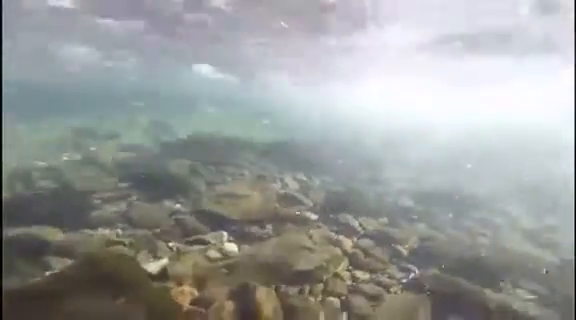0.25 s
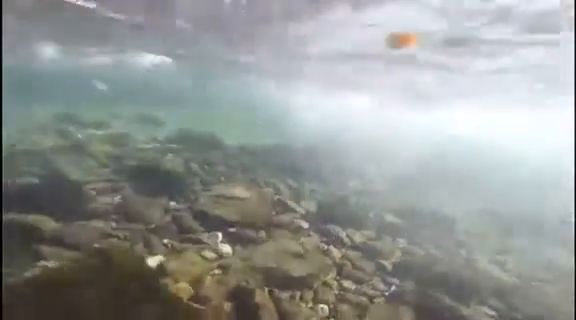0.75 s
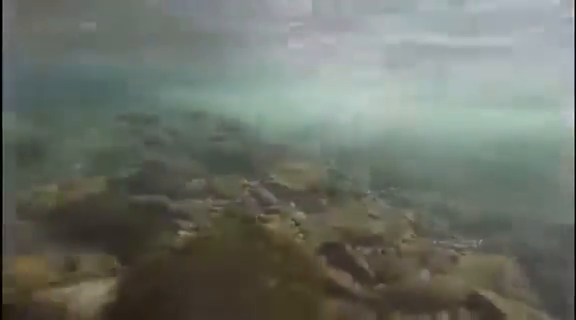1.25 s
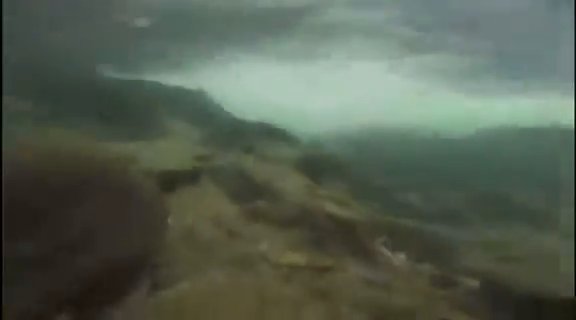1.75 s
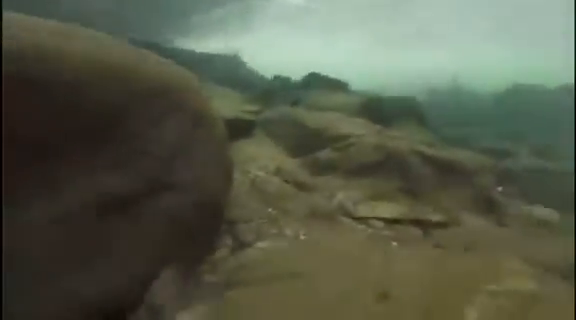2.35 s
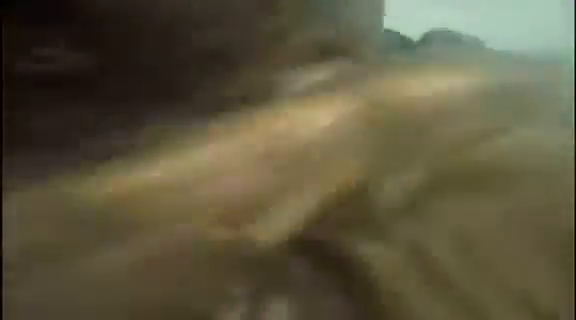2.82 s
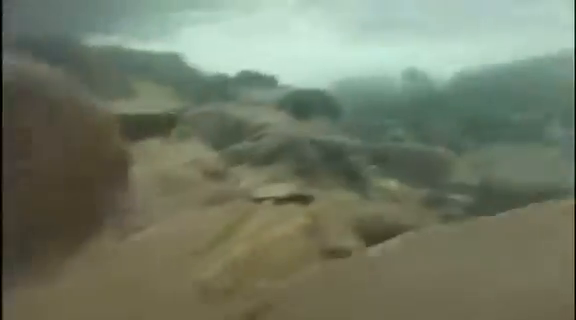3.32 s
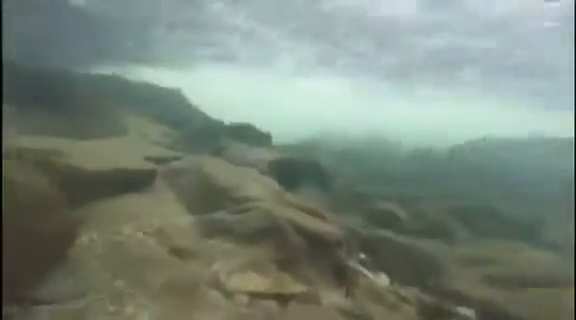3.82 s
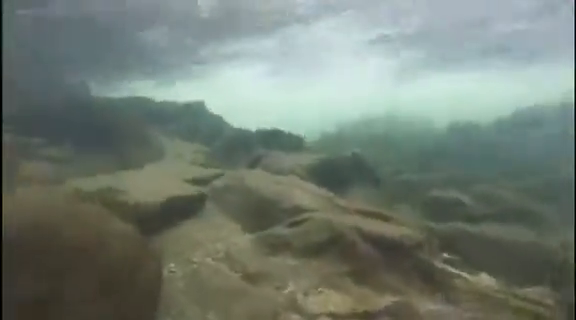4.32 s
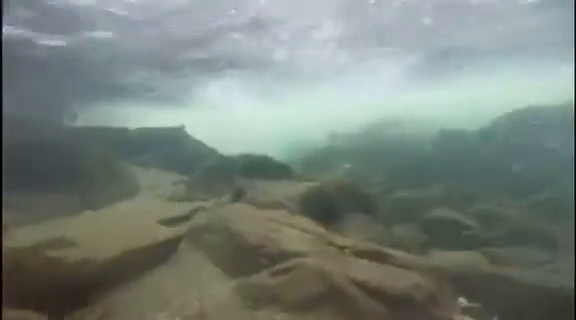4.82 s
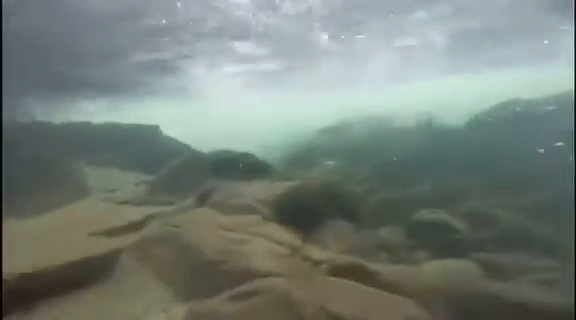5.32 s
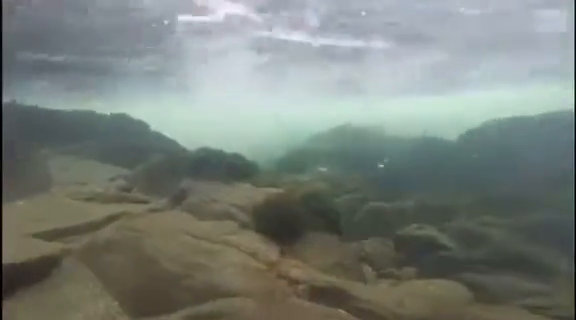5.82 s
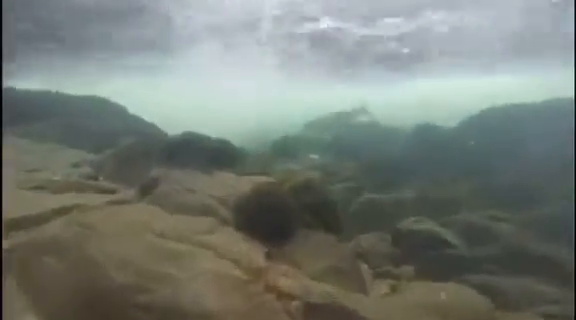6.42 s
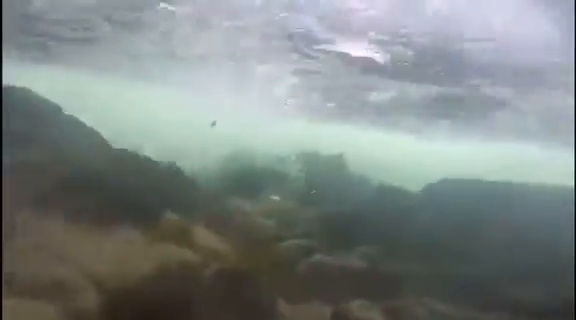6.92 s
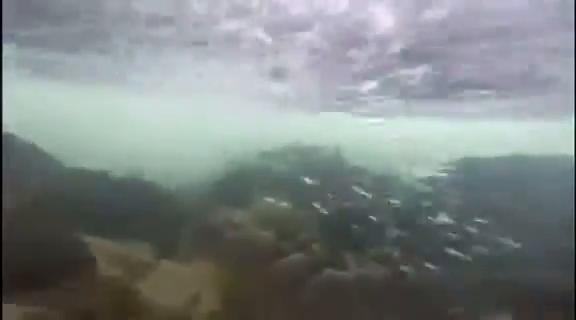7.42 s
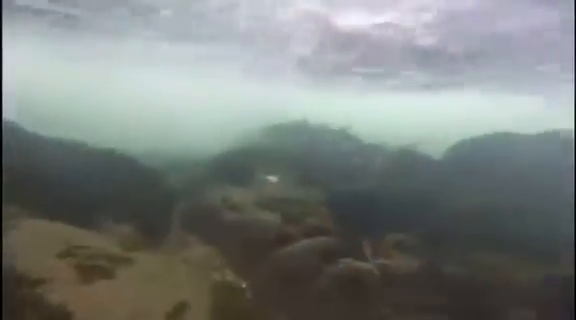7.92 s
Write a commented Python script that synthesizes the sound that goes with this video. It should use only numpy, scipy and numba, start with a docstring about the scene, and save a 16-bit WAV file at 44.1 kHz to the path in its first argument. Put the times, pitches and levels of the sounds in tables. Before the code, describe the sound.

Everything is close, mono and muffled, heard from inside a sealed hard housing under shallow river water. Deep uneven rumble, grip rub and hollow gurgle start at once; at 0.14 s a very loud, short pebble knock strikes. A softer click comes at 0.7 s, then from 0.88 to 1.4 s gritty scraping and crowded ticks. From 1.55 to 1.75 s a quick dull plastic rattle runs, with another click at 1.94 s. Low buffets continue until a heavy thump at 2.75 s, followed by rubbing and dense scraping; 3.05-3.33 s is the harshest, with hard bright clicks, crunch and slight overload. It drops suddenly. A lone click sounds at 3.69 s, then muted bumps at 4.3-4.7 s. From 5 s quiet flow carries bubble blips, clustered near 6 s; low rumbling jolts come around 6.75 s, then small blips and sparse ticks until 8.1 s, over faint hiss and whine.

```python
"""River flow buffets a sealed camera housing carried under shallow water over a stony bed.
Filtered noise gives the rocking and the rub of the grip; swarms of short rings give gurgle and grit.
Pebbles click, grains tick and dull dents rattle the wall: decaying modes, with noise cracks for the pebbles.
Soft blips, mostly bubbles, ring with rising pitch, bumps thud in body and shell,
and sines give the faint whine of the electronics over a thin hiss of noise bands."""
import sys
import numpy as np
from scipy import signal
from scipy.io import wavfile
from scipy.ndimage import uniform_filter1d
from numba import njit

SR = 44100
rng = np.random.default_rng(int(sys.argv[2]) if len(sys.argv) > 2 else 0)


def wav_out(sig):
    """Save sig, one row per channel (or a flat mono array), as 16-bit PCM at SR to the path in sys.argv[1]."""
    wavfile.write(sys.argv[1], SR, np.round(np.clip(np.atleast_2d(sig).T, -1, 1) * 32767).astype(np.int16))


N = 359856

# Steady current round the housing: time_s [s], buffet_db [dB], grip_db [dB], gurgle_db [dB]
CURRENT = [(0, -35.5, -43, -40.5), (.45, -40, -48, -43), (.8, -43.5, -49.5, -42), (1.3, -47.5, -49, -51.5),
           (1.85, -40, -62, -50.5), (2.3, -38.5, -52, -51), (2.7, -39.5, -56, -54), (2.9, -26, -36, -42.5),
           (3.2, -33.5, -43, -39.5), (3.33, -37, -61, -64.5), (3.85, -37.5, -55.5, -51.5),
           (4.25, -45, -54, -51.5), (4.899, -46, -57, -59), (5.5, -51.5, -55.5, -50.5),
           (6.55, -47.5, -57, -53), (6.9, -35, -54.5, -55.5), (7.4, -37.5, -54.5, -49.5),
           (8.16, -39.5, -53, -47.5)]
# Jolts of the carrying hand: crest_s [s], buffet_db [dB], grip_db [dB], gurgle_db [dB]
HAND_JOLTS = [(0.155, -27, -40, -30.5), (0.589, -27, -36, -36.5), (0.904, -25.5, -30.5, -32.5),
              (.95, -34, -38.5, -34), (1.104, -25, -44, -38.5), (1.201, -28.5, -47, -40),
              (1.426, -36, -44, -45), (1.6, -31, -41, -50), (1.665, -42, -54, -44.5),
              (1.75, -36.5, -46.5, -44), (2.018, -35, -37, -44), (2.089, -27.5, -53, -41),
              (2.34, -34, -44.5, -45), (2.49, -25.5, -56, -61), (2.618, -29, -70, -46),
              (2.761, -19, -28.5, -40.5), (2.831, -42, -23, -55), (2.978, -21.5, -50, -46),
              (3.108, -20, -34.5, -34), (3.652, -34.5, -48, -62), (4.341, -27, -63, -46.5),
              (4.409, -32.5, -48.5, -59), (4.5, -20, -39, -50), (4.716, -25, -53, -49),
              (6.341, -47, -73, -43), (6.742, -23.5, -56, -60), (6.835, -28.5, -68, -49),
              (6.94, -45, -64, -48)]
# Slopes before and after a jolt's crest: buffet, grip, gurgle [dB/s]
JOLT_RISE = (456, 506, 402)
JOLT_FALL = (198, 301, 298)
# Grit drifting past: time_s [s], grains_db [dB], silt_db [dB], treble_db [dB]
DRIFTING_GRIT = [(0, -62.5, -79, -76), (.85, -56.5, -68.5, -80), (1.5, -61, -52, -93),
                 (1.9, -55.5, -65, -69), (2.7, -60.5, -58.5, -68), (3.5, -59.5, -61.5, -71.5),
                 (4.0, -57, -70, -68), (4.7, -68, -58, -71), (5.1, -61.5, -75, -68.5),
                 (6.1, -62.5, -67, -69.5), (7.3, -58, -71, -68), (8.16, -83, -57.5, -68)]
# Scrapes on stones: start_s [s], length_s [s], grains_db [dB], silt_db [dB], treble_db [dB], sand_db [dB]
STONE_SCRAPES = [(0, 0.11, -58.5, -49.5, -62, -57), (0.135, 0.061, -51, -62, -86, -54),
                 (0.539, 0.041, -60, -68, -64.5, -50.5), (0.876, 0.036, -38, -55, -60, -51),
                 (0.928, 0.08, -45, -36.5, -58.5, -39.5), (1.018, 0.15, -45.5, -55, -56, -57.5),
                 (1.18, 0.17, -48.5, -53, -62, -55), (1.35, 0.06, -50, -66, -55.5, -44.5),
                 (1.411, 0.01, -38, -39, -60, -51), (1.576, 0.12, -55.5, -50, -82, -61),
                 (2.752, 0.3, -50.5, -57, -62.5, -60), (2.852, 0.05, -58.5, -38.5, -53.5, -63),
                 (2.903, 0.1, -59, -39.5, -56.5, -70), (3.009, 0.12, -43.5, -33.5, -54.5, -47),
                 (3.143, 0.061, -36, -36, -55.5, -45.5), (3.22, 0.04, -43, -42.5, -52, -38),
                 (3.25, 0.016, -43, -40, -66, -52), (3.587, 0.041, -59, -67, -71, -70),
                 (3.693, 0.004, -48, -53, -48, -57), (4.12, 0.058, -61, -57, -69, -63),
                 (4.33, 0.012, -65, -49.5, -62, -72), (4.473, 0.044, -66, -57, -71, -64),
                 (4.696, 0.039, -59, -58, -80, -59), (7.334, 0.023, -65, -50.5, -67, -57),
                 (7.985, 0.14, -59.5, -82, -61.5, -65.5)]
# Wall modes that the grains excite: pitch_hz [Hz]
WALL_MODES = (1275, 1620, 1818, 2517, 3056)
# Pebble clicks: start_s [s], level_db [dB], low_hz [Hz], low_db [dB], high_hz [Hz], high_db [dB],
# crack_db [dB], t60_s [s]; low_db, high_db and crack_db are relative to level_db, t60_s is limited in use
PEBBLE_CLICKS = [(0.0934, -29, 1870, -4, 2460, -23, -13, 0.06),
                 (0.14, 2.2, 1346, -3.5, 2950, -21.5, -17, 0.0095),
                 (0.1585, -4.5, 1600, -3.5, 3550, -8, -30, 0.02),
                 (0.5345, -39, 1830, -18, 2650, 0.5, -24, 0.043),
                 (0.71, -14.5, 1894, -1.5, 3380, -7, -20, 0.026),
                 (0.833, -29.5, 2050, -5.5, 2380, -11, -11, 0.039),
                 (0.8804, -11.5, 1140, -5, 2570, -18, -13, 0.016),
                 (0.952, -17, 1830, -12, 2440, -10, -20, 0.026),
                 (1.008, -19.5, 1530, -8, 2520, -16, 0.5, 0.02),
                 (1.061, -14, 1150, -4, 2900, -32, -21, 0.046),
                 (1.197, -29, 1990, -3, 2410, -2.5, -14, 0.024),
                 (1.2493, -33, 1610, 2.5, 2620, -18, -8, 0.027),
                 (1.2812, -27.5, 1700, -10, 2780, -3.5, -16, 0.04),
                 (1.3168, -23.5, 2400, -10, 2390, -14, 1, 0.034),
                 (1.348, -27, 1540, -13, 2700, -3, -20, 0.021),
                 (1.3606, -25, 2480, -10, 2480, -0.5, -22, 0.02),
                 (1.3766, -23, 2100, -2, 2450, -10, -23, 0.016),
                 (1.3867, -17, 2250, -10, 2470, -4.5, -2, 0.013),
                 (1.4071, -24, 1570, -2, 3330, -7, -18, 0.018),
                 (1.5148, -22.5, 2010, -7, 2450, -11, -4, 0.042),
                 (1.559, -24.5, 1530, 2.5, 2860, -23, -28, 0.012),
                 (1.5705, -24, 2500, 1, 2840, 1, -27, 0.011), (1.589, -16, 2180, 0, 2420, -11, -30, 0.014),
                 (1.605, -22, 1830, 3, 2470, -25, -22, 0.011),
                 (1.6249, -18, 1810, -2, 2480, -21, -7.5, 0.014),
                 (1.635, -22.5, 2430, -4.5, 2440, -15, -5, 0.031),
                 (1.661, -10, 2465, -7, 2515, -9, -8, 0.03),
                 (1.672, -16.5, 1700, 0, 2450, -18, -29, 0.0036),
                 (1.6884, -30, 2380, -1, 3500, -4.5, -2, 0.018),
                 (1.729, -13.5, 1960, -10.5, 5880, -18, -2.5, 0.016),
                 (1.94, -10.5, 1930, -6.5, 2990, -2.5, -4.5, 0.024),
                 (2.299, -29.5, 2240, -14, 2420, -17, -3, 0.04),
                 (2.7481, -23, 1650, -11.5, 2590, -20, 0, 0.06),
                 (2.798, -35.5, 3900, -14, 6040, -6.5, -6, 0.012),
                 (2.831, -25, 1800, -5, 2710, -21, -21, 0.048),
                 (2.8459, -24.5, 1600, -7, 2190, -3.5, -15, 0.022),
                 (2.8699, -22.5, 1480, -2, 3460, -28, -17, 0.025),
                 (2.8754, -22, 960, -9, 2630, -15, 2.5, 0.02),
                 (2.9249, -25, 1820, -0.5, 2610, -27, -20, 0.032),
                 (2.941, -29, 1400, -9, 2200, 0, -10, 0.018), (2.967, -36, 3680, -7, 5500, -4, -8, 0.014),
                 (3.012, -39.5, 3650, 3, 5600, -11, -10, 0.026),
                 (3.02, -20.5, 2020, 0.5, 2450, -20, -16, 0.036),
                 (3.06, -5.5, 1380, -24, 5240, -6, -2.5, 0.0038),
                 (3.077, -17.5, 3730, -8, 8600, -14.5, 4, 0.011),
                 (3.0828, -6, 2100, -7, 4440, -7.5, -20, 0.017),
                 (3.139, -16.5, 1480, -15, 4030, -4, -26, 0.0092),
                 (3.1512, 0.9, 2480, -9.5, 3040, -5, -24.5, 0.019),
                 (3.1553, -14.5, 2450, -20, 4730, 6.5, 4, 0.012),
                 (3.1727, -13, 1530, -8.5, 7200, -12, -12, 0.023),
                 (3.1875, -1, 2450, -12, 3890, -9, -6, 0.019),
                 (3.2112, -5.5, 2330, -17, 4140, -3, -21, 0.014),
                 (3.2536, -2.5, 2310, -12, 2640, 0, -23, 0.014),
                 (3.265, -25, 2470, -5, 4540, -3.5, -10, 0.029),
                 (3.2841, -6, 2010, -14.5, 7260, -9, -7, 0.02),
                 (3.304, -26, 1850, -12, 6450, -4, -10, 0.034),
                 (3.328, -12, 2220, -11.5, 5780, -7, -12, 0.014),
                 (3.686, -10, 1696, -10, 2770, -17, 2, 0.032),
                 (4.072, -36.5, 1480, 2, 2930, -28.5, -23, 0.068),
                 (4.326, -40, 750, -4, 1500, -7, -3, 0.025), (4.477, -39, 690, -2, 1500, -22, -18, 0.03),
                 (5.633, -36, 1125, -5.5, 2560, -20, -1, 0.095),
                 (6.131, -38, 1340, -2.5, 4180, -10.5, -10, 0.045),
                 (6.982, -35, 4400, -5, 6300, -9, -6, 0.005),
                 (7.338, -27, 2440, -12, 2610, -0.5, -18, 0.011)]
# Single grains on the wall: start_s [s], level_db [dB, sounded 1 dB lower], pitch_hz [Hz]
GRAIN_TICKS = [(.042, -34.5, 2780), (.145, -29, 926), (0.1573, -13, 2470), (.1978, -43, 2260),
               (0.2283, -42, 2200), (0.2655, -43.5, 3130), (.311, -49, 6950), (0.438, -41.5, 2550),
               (.6532, -45, 1930), (0.779, -38, 1520), (0.902, -30, 2220), (.922, -30, 2500),
               (0.933, -26, 2650), (.944, -27, 2270), (.959, -25, 2400), (.982, -38, 2970),
               (.968, -26, 2300), (0.989, -27, 2500), (1.01, -39, 2700), (1.025, -39, 4800),
               (1.039, -37, 3800), (1.056, -32, 2520), (1.066, -24.5, 1650), (1.079, -33, 2780),
               (1.090, -36, 3800), (1.138, -39, 3200), (1.144, -39.5, 4870), (1.156, -42, 1610),
               (1.1787, -39, 1940), (1.2172, -34, 2470), (1.223, -31, 2500), (1.270, -42, 4300),
               (1.273, -32, 1630), (1.283, -39, 4420), (1.291, -39, 4400), (1.290, -31.5, 1640),
               (1.302, -28, 2380), (1.307, -29.5, 4340), (1.311, -29, 6970), (1.324, -30, 2400),
               (1.332, -35, 3350), (1.378, -32.5, 4850), (1.399, -30, 2800), (1.408, -33.5, 5000),
               (1.415, -32, 1500), (1.415, -36, 6700), (1.519, -30, 1370), (1.644, -40, 2900),
               (1.739, -25, 1410), (1.9396, -34, 4500), (2.856, -26, 1670), (2.863, -24.5, 1800),
               (2.898, -38, 1980), (2.905, -36, 1600), (2.954, -31, 2100), (2.983, -34, 2120),
               (3.032, -23, 1380), (3.043, -23, 1880), (3.053, -30, 1450), (3.06, -25, 1380),
               (3.156, -10, 8300), (3.161, -20, 4770), (3.168, -24, 4970), (3.188, -33, 7300),
               (3.21, -37, 8600), (3.225, -27, 1860), (3.263, -42, 1280), (3.271, -43, 7260),
               (3.273, -26, 2500), (3.299, -27, 1850), (3.304, -34, 3600), (4.1, -46, 2700),
               (4.1346, -43.5, 1640), (4.165, -45, 3770), (4.1835, -40.5, 2640), (4.233, -46, 1640),
               (5.1524, -43.5, 3780), (5.258, -46.5, 3620), (5.545, -45, 2400), (6.073, -43, 4600),
               (6.249, -45.5, 4630), (6.623, -45, 2630), (6.982, -47, 8000), (6.896, -43.5, 3100),
               (6.942, -37.5, 2980), (7.123, -40.5, 2330), (7.24, -47, 1650), (7.38, -47, 1890),
               (7.638, -48, 1590)]
# Dull dents of the wall, most in a quick rattle, each with a thin high ring:
# start_s [s], dent_db [dB], ring_db [dB]
WALL_DENTS = [(1.5593, -20.5, -62), (1.5707, -24, -45), (1.589, -18.5, -42), (1.6046, -15.5, -46),
              (1.624, -31, -46), (1.635, -16, -43), (1.6617, -13.5, -33), (1.6704, -21, -56),
              (1.6883, -26, -49), (1.734, -16.5, -52), (3.2495, -20, -40)]
# Soft single blips, mostly bubbles, and one knock: start_s [s], level_db [dB], pitch_hz [Hz at the start]
SOFT_BLIPS = [(.306, -35, 700), (.338, -40, 924), (.408, -34, 598), (.565, -25, 454), (.597, -33, 622),
              (.648, -31.5, 599), (.712, -34.5, 402), (.797, -34.5, 746), (.845, -37, 583),
              (.967, -26.5, 684), (1.097, -26.5, 460), (1.414, -30, 459), (1.734, -20.5, 477),
              (1.944, -31, 622), (2.005, -36, 444), (2.47, -39, 1077), (3.026, -23, 1267),
              (3.058, -25, 678), (3.073, -23, 660), (3.089, -19, 648), (3.101, -20.5, 701),
              (3.119, -20, 744), (3.142, -25, 675), (3.182, -30, 707), (3.963, -40.5, 1480),
              (3.966, -36.5, 565), (4.346, -36.5, 670), (4.454, -45, 502), (4.566, -45, 610),
              (4.619, -48, 577), (5.328, -25.5, 558), (5.373, -45, 1680), (5.446, -43, 636),
              (5.511, -32, 582), (5.712, -43, 590), (5.774, -46.5, 903), (5.777, -46, 613),
              (5.793, -41.5, 602), (5.81, -42.5, 820), (5.92, -33.5, 660), (5.974, -35, 556),
              (5.992, -34.5, 870), (5.993, -29, 694), (6.01, -37, 530), (6.025, -28.5, 586),
              (6.038, -32.5, 845), (6.308, -40.5, 873), (6.262, -48, 1640), (6.815, -44, 1290),
              (6.818, -47, 1540), (6.84, -43, 720), (6.893, -48.5, 1560), (7.028, -42.5, 1660),
              (7.07, -50, 1030), (7.21, -46.5, 1190), (7.281, -44, 1700), (7.338, -33, 635),
              (7.388, -36.5, 490), (7.501, -38.5, 547), (7.547, -41, 1590), (7.59, -39, 548),
              (7.646, -37.5, 610), (7.769, -37, 540), (7.68, -50, 1020), (7.82, -52, 900),
              (7.86, -41.5, 930), (7.89, -44, 2050), (7.951, -38, 1080), (8.016, -37.5, 645),
              (8.025, -43, 1040), (7.99, -47, 940), (8.052, -41, 890), (8.07, -45, 1110),
              (8.09, -38.5, 1620)]
# Bumps of the housing: start_s [s], level_db [dB], body_hz [Hz], shell_hz [Hz], shell_db [dB re body]
HOUSING_BUMPS = [(0.142, -21.5, 119, 365, 8), (0.88, -25, 197, 440, 6), (1.736, -34, 112, 273, 8),
                 (2.72, -25, 99, 200, -21), (2.744, -10.5, 87, 205, -12), (2.762, -13, 158, 238, -6.5),
                 (2.78, -20, 90, 162, -5), (2.809, -15.5, 166, 202, -20), (2.825, -17.5, 208, 230, 1.5),
                 (2.862, -27, 155, 283, 7.5), (3.677, -31, 124, 428, 4), (4.327, -28.5, 88.5, 346, 3.5),
                 (4.476, -34, 94, 365, 6), (4.489, -27, 58, 348, -9), (4.693, -36.5, 92, 316, -1.5)]
# Shape of the hiss spectrum: pitch_hz [Hz], density_db [relative dB per Hz]
HISS_SPECTRUM = [(53, -38), (90, -11.5), (367, -18), (583, 3), (1290, -28), (2730, -9.5), (2940, -13),
                 (3180, -15), (5780, -21.5), (8330, -25.5), (9000, -33), (11700, -63), (19800, -120)]
# Whine partials: order [multiples of the picture rate], then level_db [dB rms]
WHINE_MULTIPLES = (96, 97, 98, 195, 292, 293)
WHINE_LEVELS = (-84.5, -80, -69.5, -81, -96, -83)

SCRAPE_RISE_DB_S, SCRAPE_FALL_DB_S = 1199, 1298
SLIP_RATE_HZ, SLIP_S = 260, 0.0018  # mean rate of stick-slip jerks; decay time constant of each
CONTACT_S = .0011  # a pebble touches the wall this long
BOUNCE_S = .003  # longest delay of a secondary contact
HIGH_RING_HZ = 2710  # numerator of the high ring's share of the decay time
TICK_CYCLES, TICK_RISE_S = 55, 0.00032  # cycles per nominal 60 dB decay
DENT_HZ, DENT_T60_S, THIN_HZ, THIN_T60_S = 717, 0.0029, 4770, 0.013
BLIP_CYCLES = 56
BODY_T60_S, SHELL_T60_S = 0.059, 0.055
HISS_DB = -62  # rms of the whole hiss
PICTURE_HZ = 30000 / 1001
TOP_HZ, CONVERTER_HZ = 8950, 16300  # low-pass edges before and after the ceiling
CEILING = .71  # amplitude approached by the loudest peaks


def undb(db):
    """Logarithmic level: decibels to an amplitude ratio."""
    return 10 ** (np.asarray(db) / 20)


def unit(x):
    """Power normalisation: scale to rms 1."""
    return x / np.sqrt(np.mean(x ** 2))


def columns(table):
    """Parallel event parameters: one contiguous row per table column."""
    return np.transpose(table).copy()


def curves(table):
    """Linear interpolation: table columns joined by straight lines in time."""
    s, *values = columns(table)
    return [np.interp(np.arange(N) / SR, s, value) for value in values]


def noise():
    """White noise: independent Gaussian samples."""
    return rng.standard_normal(N)


def band(x, lo_hz, hi_hz, order=2):
    """Resonant selection: Butterworth band-pass filter."""
    return signal.sosfilt(signal.butter(order, [lo_hz, min(hi_hz, .45 * SR)], "band", fs=SR, output="sos"), x)


def walk(rate_hz):
    """Slow random modulation: levels held for 1 / rate_hz, smoothed twice, with spread near 1."""
    k = int(SR / rate_hz)
    held = np.repeat(rng.standard_normal(N // k + 1), k)
    return 1.46 * uniform_filter1d(uniform_filter1d(held, k), k)[:N]


def decay(x, seconds):
    """Exponential relaxation: each impulse leaves a tail of this time constant."""
    return signal.lfilter([1], [1, -np.exp(-1 / (seconds * SR))], x)


@njit
def rings(n, start, hz, t60, size, rise, glide):
    """Damped oscillation: sines swell for rise s, then decay; pitch glides up by a share over t60."""
    out = np.zeros(n)
    for e in range(len(start)):
        i0, length, phase, gain = int(start[e] * SR), int(t60[e] * SR), 0., size[e]
        fall = 1000. ** (-1 / max(length, 1))
        for i in range(min(length, n - i0)):
            phase += 2 * np.pi * hz[e] * (1 + glide * i / length) / SR
            if i < rise * SR:
                out[i0 + i] += gain * np.sin(np.pi / 2 * i / (rise * SR)) ** 2 * np.sin(phase)
            else:
                gain *= fall
                out[i0 + i] += gain * np.sin(phase)
    return out


def swarm(count, modes_hz, octaves, cycles, scatter_db, rise, glide, wander=0.):
    """Superposition: many rings of uneven level at random times, round modes that may wander; rms 1."""
    when = rng.random(count) * N / SR
    spread = octaves * rng.standard_normal(count)
    size = np.minimum(rng.exponential(size=count), 3.5)
    drift = wander * walk(9)[(when * SR).astype(int)]
    hz = np.clip(rng.choice(modes_hz, size=count) * 2 ** (spread + drift), 100, .4 * SR)
    return unit(rings(N, when, hz, cycles / hz, undb(scatter_db * size), rise, glide))


def swells(start, length, db, rise_db_s, fall_db_s):
    """Power addition: gain of events that rise, hold and fall on straight dB slopes."""
    t, power = np.arange(0, N + 64, 64) / SR, 0
    for s, hold, top_db in zip(start, length, db):
        before, after = np.maximum(s - t, 0), np.maximum(t - s - hold, 0)
        power = power + undb(top_db - rise_db_s * before - fall_db_s * after) ** 2
    return np.interp(np.arange(N) / SR, t, np.sqrt(power))


def buffeting():
    """Low-frequency resonance: eddies rock the housing in two noise bands; rms 1."""
    return unit(band(noise(), 21.4, 37.7) + undb(-7.5) * band(noise(), 41.3, 59.2, order=3))


def grip_rub():
    """Friction noise: the rubbing grip is a low noise band of fluctuating level; rms 1."""
    return unit(band(noise(), 76, 430, order=3) * undb(2.8 * walk(30)))


def gurgle():
    """Cavity resonance: small bubbles ring the housing's air, with a fainter, higher swarm added."""
    low = swarm(count=4000, modes_hz=(498.2, 564.7, 589.7, 611, 682.3), octaves=0.082, cycles=47.0,
                scatter_db=2.5, rise=0.002, glide=0.079, wander=.05)
    high = swarm(count=1500, modes_hz=(880, 980, 1120), octaves=.12, cycles=90.0,
                 scatter_db=4.5, rise=0.0015, glide=0.018, wander=.09)
    return low + undb(-11.0) * high


def flow():
    """Forced excitation: current and jolts add in power and drive buffeting, grip and gurgle."""
    s, *jolt_db = columns(HAND_JOLTS)
    out = np.zeros(N)
    settings = zip((buffeting(), grip_rub(), gurgle()), curves(CURRENT), jolt_db, JOLT_RISE, JOLT_FALL)
    for layer, steady_db, db, rise, fall in settings:
        jolts = swells(s, np.zeros_like(s), db, rise, fall)
        out += np.hypot(undb(steady_db), jolts) * layer
    return out


def slips():
    """Stick-slip friction: uneven random jerks, each a short burst over a small floor; rms 1."""
    strength = undb(4.0 * np.minimum(rng.exponential(size=N), 3.5))
    jerks = (rng.random(N) < SLIP_RATE_HZ / SR) * strength
    return unit(.12 + unit(uniform_filter1d(decay(jerks, SLIP_S), size=30)))


def grit():
    """Modal impact and friction: grains tick on plastic over a silt rasp; scrapes crowd them and add sand."""
    start, length, *scrape_db = columns(STONE_SCRAPES)
    clusters = undb(1.7 * walk(110)) * np.sqrt(0.71 + .25 * slips() ** 2)
    scraped = [clusters * swells(start, length, db, SCRAPE_RISE_DB_S, SCRAPE_FALL_DB_S) for db in scrape_db]
    # zip leaves out the sand, which sounds only in scrapes
    gains = [np.hypot(undb(steady_db + 0.6 * walk(25)), burst)
             for steady_db, burst in zip(curves(DRIFTING_GRIT), scraped)]
    grains = swarm(count=9000, modes_hz=WALL_MODES, octaves=0.1503, cycles=76.0,
                   scatter_db=4.0, rise=0.00032, glide=0., wander=.06)
    silt = unit(band(noise() * undb(2.2 * walk(220)), 570, 1920, order=4))
    treble = swarm(count=14000, modes_hz=(4200, 6000), octaves=0.39, cycles=180.0,
                   scatter_db=-2.5, rise=0.00023, glide=0.)
    sand = unit(band(noise() * undb(2.5 * walk(220)), 1600, 3050, order=5))
    return gains[0] * grains + gains[1] * silt + gains[2] * treble + scraped[3] * sand


def pebble_clicks():
    """Impact excitation: each pebble gives a crack and two rings, roughened by close partner modes."""
    s, level_db, low_hz, low_db, high_hz, high_db, crack_db, t60 = columns(PEBBLE_CLICKS)
    t60, out = np.clip(t60, .004, .2), np.zeros(N)
    high_share = np.minimum(HIGH_RING_HZ / high_hz, .8)  # high rings die faster
    for hz, db, share in ((low_hz, low_db, 1.), (high_hz, high_db, high_share)):
        ring_db, ring_t60 = level_db + db, share * t60
        out += rings(N, s, hz, ring_t60, undb(ring_db), CONTACT_S, 0.)
        for ratio, lag in zip((.86, 1.15), rng.random((2, len(s)))):
            late = s + BOUNCE_S * lag
            out += rings(N, late, ratio * hz, 0.77 * ring_t60, undb(ring_db - 12.5), CONTACT_S, 0.)
    strikes = np.zeros(N)
    strikes[(s * SR).astype(int)] = undb(level_db + crack_db)
    crack = band(decay(strikes, 0.00031) * noise(), 600, 4000)
    crunch = undb(-5.0) * band(decay(strikes, 0.0039) * noise(), 590, 2900)  # loose sand shaken by the blow
    return out + crack + crunch


def grain_ticks():
    """Repeated impact: each grain rings the wall briefly and bounces on a lower and a higher pitch."""
    s, level_db, hz = columns(GRAIN_TICKS)
    out = rings(N, s, hz, TICK_CYCLES / hz, undb(level_db - 1.0), TICK_RISE_S, 0.)
    for way in (-1, 1):
        late = s + BOUNCE_S * rng.random(len(s))
        near = hz * 2 ** (way * (0.088 + 0.2 * rng.random(len(s))))
        out += rings(N, late, near, 0.66 * TICK_CYCLES / near, undb(level_db - 10.5), TICK_RISE_S, 0.)
    return out


def wall_dents():
    """Damped wall response: dull dents, most in a quick rattle, each with a thin high ring."""
    s, dent_db, ring_db = columns(WALL_DENTS)
    each = np.ones(len(s))
    dents = rings(N, s, DENT_HZ * each, DENT_T60_S * each, undb(dent_db), 0.00088, 0.)
    thin = rings(N, s, THIN_HZ * each, THIN_T60_S * each, undb(ring_db), 0.00083, 0.)
    return thin - dents  # each dent starts with a negative half-wave


def soft_blips():
    """Gliding damped oscillation: soft blips, mostly bubbles, and one knock are short rings rising in pitch."""
    s, level_db, hz = columns(SOFT_BLIPS)
    return rings(N, s, hz, BLIP_CYCLES / hz, undb(level_db), 0.0053, 0.11)


def bumps():
    """Modal response: each bump thuds in one body mode and one shell mode of the housing."""
    s, level_db, body_hz, shell_hz, shell_db = columns(HOUSING_BUMPS)
    each = np.ones(len(s))
    body = rings(N, s, body_hz, BODY_T60_S * each, undb(level_db), 0.0084, 0.)
    shell = rings(N, s, shell_hz, SHELL_T60_S * each, undb(level_db + shell_db), 0.00082, 0.)
    return body + shell


def whine():
    """Harmonic series: steady sines at high multiples of the picture rate of the electronics."""
    turn = 2 * np.pi * PICTURE_HZ * np.arange(N) / SR
    return sum(np.sqrt(2) * undb(db) * np.sin(k * turn) for k, db in zip(WHINE_MULTIPLES, WHINE_LEVELS))


def hiss():
    """Spectral shaping: third-octave noise bands weighted by a density curve, each flickering alone."""
    hz, density_db = columns(HISS_SPECTRUM)
    out = np.zeros(N)
    for centre in 100 * 2 ** (np.arange(20) / 3):
        # bandwidth grows with the centre frequency
        band_db = np.interp(np.log(centre), np.log(hz), density_db) + 10 * np.log10(centre)
        layer = unit(band(noise(), centre * 2 ** (-1 / 6), centre * 2 ** (1 / 6)))
        out += undb(band_db + 1.2 * walk(30)) * layer
    return undb(HISS_DB) * unit(out)


def scene():
    """Linear superposition: all sources add at one microphone inside the housing."""
    water_and_grit = flow() + grit()
    impacts = pebble_clicks() + grain_ticks() + wall_dents() + soft_blips() + bumps()
    return (water_and_grit + impacts + whine() + hiss())[None]


def lowpass(x, hz):
    """Band limitation: steep elliptic low-pass filter."""
    return signal.sosfilt(signal.ellip(12, .2, 90, hz, fs=SR, output="sos"), x)


def record(dry):
    """Nonlinear distortion: treble is cut, then peaks press on a ceiling and splash above the cut."""
    x = lowpass(dry, TOP_HZ)
    limited = x / (1 + (x / CEILING) ** 14) ** (1 / 14)
    return lowpass(limited, CONVERTER_HZ)


dry = scene()
out = record(dry)
wav_out(out)
```